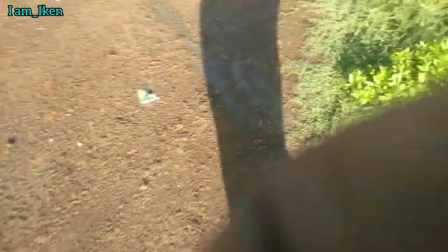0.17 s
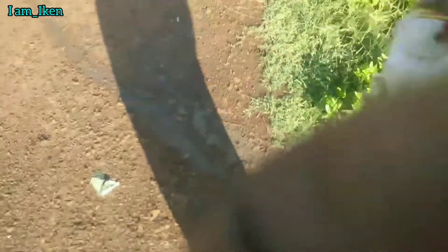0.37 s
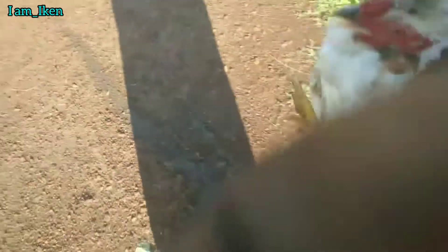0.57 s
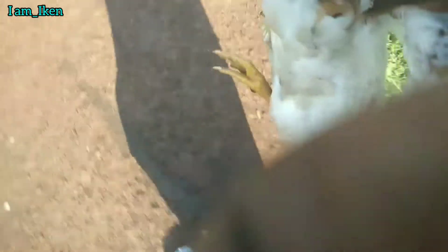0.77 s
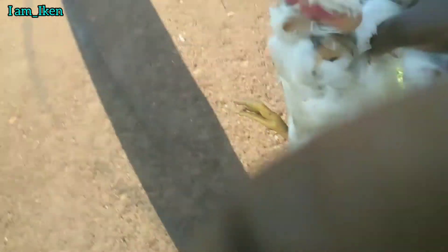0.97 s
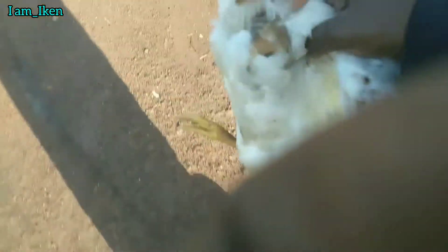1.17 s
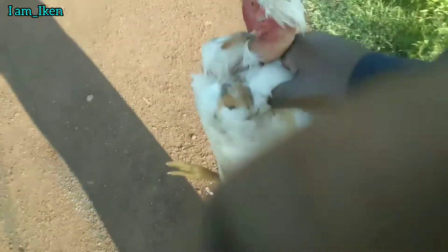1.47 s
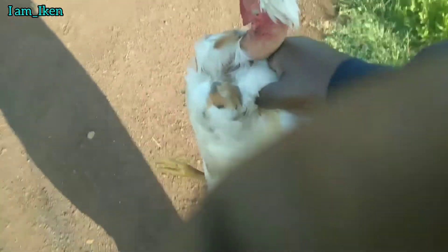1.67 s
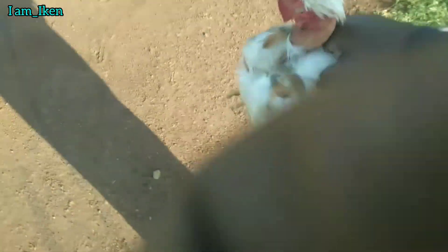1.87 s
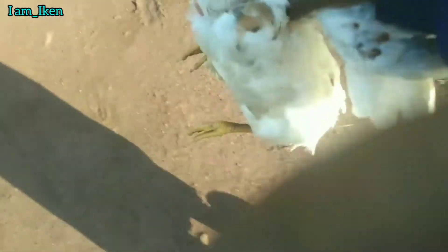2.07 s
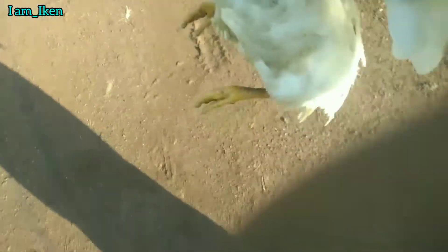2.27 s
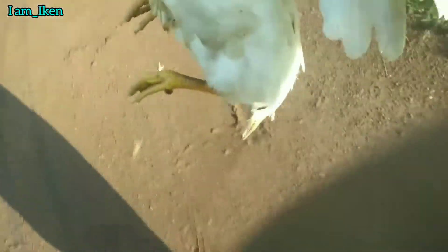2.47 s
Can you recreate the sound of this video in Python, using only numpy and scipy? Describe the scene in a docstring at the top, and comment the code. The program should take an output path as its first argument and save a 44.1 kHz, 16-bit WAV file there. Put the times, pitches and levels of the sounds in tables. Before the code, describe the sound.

Three loud, hoarse squawks from a hen held close outdoors, her feathers rustling softly.

```python
"""A squawking hen

A hen, carried by hand outdoors close to a camera, squawks three times. Her voice is a stream of pulses
and puffs of air, shaped by her throat and beak. Each call starts as a hoarse rasp, opens into a scream
or a fluttering squawk and drops as the beak shuts. Feathers rustle between the calls (grainy noise),
a small bird whistles far off (gliding tones) and the air rumbles faintly (low noise)."""
import sys
import numpy as np
from scipy import signal
from scipy.fft import rfft, irfft, next_fast_len
from scipy.io import wavfile
from scipy.ndimage import uniform_filter1d, map_coordinates

SR = 44100
rng = np.random.default_rng(int(sys.argv[2]) if len(sys.argv) > 2 else 0)


def master_out(mix):
    """Clip the mix to full scale and print it as 16-bit PCM to the path in sys.argv[1]."""
    frames = np.transpose(np.atleast_2d(mix))
    ceiling = np.clip(frames, -1, 1)
    pcm = np.round(ceiling * 32767).astype(np.int16)
    wavfile.write(sys.argv[1], SR, pcm)


N = 114660

# The three calls. Each row: time in seconds, pitch in Hz, level in dB, then three amounts from
# 0 to about 1: roughness, doubling (every other pulse comes late and weak) and flutter.
FIRST_CALL = [(.17, 735.4, -45, 0.31, 0, 0.08), (0.194, 722.3, -28.5, 0.48, 0, 0),
              (0.244, 752, -23, 0.38, 0.57, 0.01), (.268, 829.4, -28.5, 0.47, 0.3, 0),
              (.305, 781, -20.5, 1.03, 0.7, 0.06), (0.374, 795.7, -21.5, 0.99, 0.04, 0),
              (.41, 756.3, -14, 0.77, 0.07, 0.03), (.423, 748.7, -16.5, 0.2, 0.23, 0),
              (0.446, 732.3, -14, 0.01, 0.3, 0.07), (.458, 743.3, -16, 0.82, 0.53, 0),
              (.549, 723.6, -14, 0.43, 0.1, 0.08), (.555, 713, -15.5, .06, 0.13, 0.08),
              (0.592, 689, -11.5, 0.17, 0, 0.2), (0.641, 648.4, -16.5, .08, 0.01, 0.28),
              (0.731, 654, -16, 0.1, 0.14, 0.17), (0.786, 626, -17.5, 0.08, 0, 0.16),
              (.815, 622.3, -13, 0, 0.01, 0.2), (0.837, 644.4, -14, 0.32, 0, 0.05),
              (.875, 634.4, -14, 0.1, 0.01, 0.22), (0.927, 650.7, -15.5, 0.1, 0, 0.3),
              (.953, 612.4, -14, 0.18, 0.06, 0.3), (.968, 593.4, -16, 0.41, 0.12, 0.5),
              (1.015, 578, -19.5, 0.29, 0, 0.57), (1.034, 528, -21.5, 0.7, 0.5, 0.07),
              (1.045, 457.2, -61.5, 1.07, 0.8, 0)]
SECOND_CALL = [(1.408, 711, -51.5, 1, 0.56, 0.13), (1.425, 730.6, -32.5, 0.74, .3, 0.059),
               (1.44, 757.4, -30.5, 0.23, 0.19, 0.045), (1.45, 742, -64, .3, .2, 0),
               (1.462, 719, -51, .3, 0.33, 0.038), (1.47, 717.4, -30, 0.57, .5, 0.16),
               (1.525, 683.5, -28, 0.22, .8, 0.11), (1.584, 715.4, -31.5, 0.62, 0.42, 0.092),
               (1.642, 705.2, -27, 0.63, 0.25, 0.44), (1.686, 664.3, -22, .35, .1, 0.82),
               (1.77, 637.7, -19.5, 0.3, 0.18, 0.48), (1.866, 674.5, -19, 0.36, .1, 0.68),
               (1.925, 654, -19.5, 0.47, .1, 0.34), (1.968, 582.4, -26.5, 0.99, .6, 0.33),
               (1.977, 470, -59, 0.62, 0.81, 0.013)]
THIRD_CALL = [(2.067, 669.5, -47, 0.39, 0.26, 0.034), (2.085, 669, -29, .35, 0.93, 0.027),
              (2.13, 719.2, -32.5, .55, 0.91, 0), (2.151, 752.5, -30.5, 0.18, 1, 0.15),
              (2.182, 798, -31, 0.27, .9, 0), (2.198, 702, -23.5, 0.3, .3, 0.1),
              (2.244, 673, -19, 0.19, .1, 0.54), (2.284, 659, -20.5, 0.45, 0.082, 0.6),
              (2.316, 628, -19.5, .35, 0.078, 0.56), (2.341, 611.5, -24.5, 0.15, 0.078, 0.34),
              (2.357, 570, -23, 0.15, .2, .1), (2.368, 520, -27, 0.94, .6, 0),
              (2.382, 484, -47, .9, .7, 0.89)]
# How each call flutters. Each row: time of one crest in seconds, rate in Hz, lag of the pitch
# behind the swell in radians.
CALL_FLUTTERS = [(.953, 34.97, 0.5), (1.77, 39.28, 4), (2.249, 42.8, 2)]
FLUTTER_DB, FLUTTER_BEND, FLUTTER_BREAK = 4.5, 0.077, 0.98  # swell, pitch swing, roughness in the dips
FLUTTER_BRIGHT_DB, BRIGHT_HZ = 4.5, 1550  # the crests lift the treble above this frequency
PITCH_JITTER, TIME_SCATTER, SIZE_SCATTER_DB = 0.05075, 0.093, 5.5  # unevenness at full roughness
DOUBLING_SHIFT, DOUBLING_SIZE = 0.065, 0.097  # share of a cycle, share of a pulse's size
GROWL_HZ, GROWL_DEPTH, GROWL_BEND = 135, 0.39, 0.064  # a slower beat: rate, share of level, of pitch
BREATH_DB, BREATH_GROWTH = -1, 1.32  # breath at full roughness, and how steeply it grows
# Tone colours of the throat and beak, by name. Each row: frequency in Hz, gain in dB.
THROAT_COLOURS = { "wheeze": [(200, -39), (380, -4), (550, -12), (750, 2), (1000, -8.5), (1500, -17.5),
                  (2000, -5.5), (2600, -1), (3300, -18.5), (4200, -19.5), (5200, -34.5), (7500, -21.5),
                  (10500, -41.5), (15000, -45.5)], "hoarse": [(200, -34), (360, -2.5), (520, -8), (720, 3),
                  (950, -11), (1400, -2), (1750, -4.5), (2300, -8.5), (2800, -9.5), (3700, -13),
                  (4700, -32), (7500, -28), (10000, -41.5), (15000, -65)], "rasp": [(250, -38.5),
                  (500, -12), (750, 1.5), (1050, -7.5), (1550, 0), (2050, -10.5), (2600, 7), (3050, 8),
                  (3500, -10), (4200, -6), (5200, -22.5), (6500, -21), (9000, -21), (11000, -38.5),
                  (15000, -47.5)], "scream": [(250, -18.5), (450, -11), (660, 4.5), (950, -3.5),
                  (1300, -1.5), (1600, 2), (1950, 5), (2300, 0.5), (2650, -3.5), (3300, 5), (3900, -5),
                  (4600, -10.5), (5600, -17), (6500, -7.5), (7700, -20.5), (9500, -25), (11500, -46),
                  (15000, -61.5)], "squawk": [(250, -25), (450, -10), (670, -1.5), (930, -5), (1320, 5.5),
                  (1650, 1.5), (1950, -3), (2250, -11), (2600, -9.5), (2900, -17.5), (3250, -6), (3850, -9),
                  (4600, -21), (7500, -24), (10000, -37.5), (15000, -51.5)], "cackle": [(250, -27.5),
                  (450, -10.5), (680, -5.5), (920, -2), (1300, 0.5), (1600, -4.5), (1920, 3), (2250, -11),
                  (2550, -1), (2950, -18.5), (3300, -6.5), (3950, -13), (4600, -18.5), (6200, -30.5),
                  (8000, -32), (10500, -51), (15000, -75.5)], "shut": [(150, -20), (260, -8), (600, -8),
                  (1150, 2), (1500, 0), (2000, -17.5), (2450, -11), (3000, -28), (3600, -11.5), (4600, -46),
                  (8000, -40.5), (15000, -79.5)]}
# The voice fades from one colour to the next. Each row: time in seconds, name of the colour.
THROAT_CHANGES = [(.25, "wheeze"), (.33, "rasp"), (0.519, "rasp"), (.575, "scream"), (0.949, "scream"),
                  (0.976, "cackle"), (1.017, "shut"), (1.43, "shut"), (1.47, "hoarse"), (1.569, "hoarse"),
                  (1.68, "squawk"), (1.925, "squawk"), (1.969, "shut"), (2.059, "hoarse"), (2.18, "hoarse"),
                  (2.22, "cackle"), (2.321, "cackle"), (2.355, "shut")]
# A narrow, moving dip in the treble. Each row: time in seconds, centre in Hz, depth in dB.
MOVING_NOTCH = [(.25, 3180, 3.5), (.3, 3135, 23.5), (.45, 3515, 13), (0.519, 4077, 26.5),
                (0.561, 4860, 26.5), (0.621, 4684, 25), (.68, 4514, 2.5), (1.999, 4487, 7),
                (2.14, 4500, 12), (2.33, 4380, 16)]
NOTCH_WIDTH = 0.088  # share of its frequency
SQUEAK_S, SQUEAK_WIDTH_S, SQUEAK_HZ, SQUEAK_DB, SQUEAK_FALL_DB = 1.46, 0.013, 1220, -30.5, 8.5
# The cluck that ends each call. Each row: time in seconds, level in dB.
CLOSING_CLUCKS = [(1.033, -46), (1.966, -43), (2.369, -46.5)]
CLUCK_HZ, CLUCK_WIDTH_S = 242.5, 0.015
# The head swings past two microphones. Each row: time in seconds, how much earlier the left one
# hears it in milliseconds, how much louder in dB.
HEAD_SWING = [(.2, 0.22, 5.5), (.43, .17, 3.5), (.52, 0.12, 2), (.6, 0.089, -1.5), (.7, 0.016, -0.5),
              (.8, 0.0043, 0), (.9, -0.055, -2), (1, 0.0047, 1.5), (1.52, -0.037, 0.5), (1.85, .01, 0.5),
              (2.12, -0.055, 0), (2.33, -0.081, -1)]
# Echoes off arm, body and ground, and from the yard. Each row: frequency in Hz, gain in dB.
NEAR_COLOUR = [(500, -7.5), (2000, -12), (4000, -7.5), (8000, 5)]
YARD_COLOUR = [(300, -42.5), (1500, -36), (8000, -29.5)]
NEAR_FADE_S, YARD_FADE_S = 0.046, 0.55  # time to fade by 60 dB
# Feathers brushing. Each row: time in seconds, level in dB.
RUSTLE_LEVELS = [(0, -80), (1, -74), (1.13, -61), (1.16, -55), (1.22, -54.5), (1.28, -58.5), (1.33, -85.5),
                 (1.95, -58), (2.05, -53), (2.3, -48), (2.45, -73.5), (2.495, -57.5), (2.6, -50)]
# Feathers flick against the hand. Each row: start in seconds, peak in dB before FLICK_GAIN_DB is added,
# seconds to fade by 60 dB.
FLICKS = [(1.1458, -32.5, 0.015), (1.1564, -36, 0.017), (1.2145, -34, 0.015), (2.0576, -30, 0.022),
          (2.4678, -41.5, 0.018), (2.496, -37, 0.012)]
RUSTLE_GRAIN_DB, FLICK_GAIN_DB = 4.5, -7
# The tone colour of the feathers. Each row: frequency in Hz, gain in dB.
FEATHER_COLOUR = [(240, -46), (400, -9), (519, -5.5), (809, -17), (1630, -4), (2750, -14.5), (8400, -11),
                  (10700, -24), (15500, -25.5)]
# The far bird, one list for each whistle. Each row: time in seconds, pitch in Hz, level in dB.
BIRD_WHISTLES = [
    [(1.08, 6030, -66), (1.093, 4100, -63), (1.107, 7470, -72), (1.14, 7230, -70), (1.19, 4850, -71)],
    [(2.0, 5330, -78), (2.02, 4700, -56), (2.045, 3302, -50)],
]
# Tone colours of the air's rumble and the outdoor hush. Each row: frequency in Hz, gain in dB.
RUMBLE_COLOUR = [(20, -24), (40, -17.5), (65, -2), (110, -3.5), (170, -12.5), (270, -16.5), (380, -27),
                 (550, -39.5), (1000, -69.5)]
HUSH_COLOUR = [(200, -12), (400, -23.5), (750, -23.5), (1050, -22), (1300, -2.5), (1800, 4), (2400, -23),
               (3500, -24), (6000, -23), (10000, -39.5), (15000, -50)]
RUMBLE_DB, HUSH_DB = -52, -65
TOP_HZ = 15800


def hen():
    """The voice box buzzes, the throat and beak shape the buzz, and a squeak and clucks join in."""
    calls = (FIRST_CALL, SECOND_CALL, THIRD_CALL)
    parts = [voice_box(call, *flutter) for call, flutter in zip(calls, CALL_FLUTTERS)]
    buzz, loudness, swell = np.sum(parts, axis=0)
    treble = signal.sosfiltfilt(signal.butter(2, BRIGHT_HZ, "high", fs=SR, output="sos"), buzz)
    buzz = buzz + treble * (amp(FLUTTER_BRIGHT_DB * swell) - 1)
    voice = moving_notch(throat(buzz))
    # Even out the level first, so that the call tables set the loudness.
    power = np.abs(uniform_filter1d(voice ** 2, size=700))
    return loudness * voice / np.sqrt(power + 1e-4 * power.mean()) + squeak() + clucks()


def voice_box(call, crest_s, flutter_hz, pitch_lag):
    """Each vibration gives a pulse and a puff of air. Returns the buzz, its loudness and its swell."""
    t = clock()
    hz, db, rough, doubling, flutter = curves(call)
    sounding = (t > call[0][0]) & (t < call[-1][0])
    flutter_angle = 2 * np.pi * flutter_hz * (t - crest_s) + 0.68 * wobble(30)
    swell = flutter * np.cos(flutter_angle)
    rough = np.clip(rough * (1 - FLUTTER_BREAK * swell), 0.01, 1.2)
    growl = rough * np.sin(2 * np.pi * GROWL_HZ * t + 2 * wobble(60))
    bend = FLUTTER_BEND * flutter * np.cos(flutter_angle - pitch_lag) + GROWL_BEND * growl
    jitter = PITCH_JITTER * rough * wobble(350) + 0.0045 * wobble(90)
    hz = hz * (1 + bend + jitter)
    # Place one pulse wherever a whole cycle is complete.
    phase = np.cumsum(hz * sounding) / SR
    cycles = np.arange(1, int(phase[-1]))
    positions = np.interp(cycles, phase[sounding], np.flatnonzero(sounding))
    at = positions.astype(int)
    # Roughness changes each pulse's timing and size at random; doubling does so by turns.
    time_luck, size_luck = np.sqrt(3) * rng.uniform(-1, 1, (N // 100, 2))[:len(cycles)].T
    by_turns = doubling[at] * (-1) ** cycles
    period = SR / hz[at]
    positions = positions + period * (TIME_SCATTER * rough[at] * time_luck + DOUBLING_SHIFT * by_turns)
    sizes = amp(SIZE_SCATTER_DB * rough[at] * size_luck) * (1 - DOUBLING_SIZE * by_turns)
    puffs = (1 + np.cos(2 * np.pi * phase)) * rng.standard_normal(N)
    breath = amp(BREATH_DB) * rough ** BREATH_GROWTH * puffs * sounding
    buzz = (pulses(positions, sizes * np.sqrt(period)) + breath) * (1 + GROWL_DEPTH * growl)
    return buzz, sounding * amp(db + FLUTTER_DB * swell), sounding * swell


def throat(buzz):
    """The throat changes shape, fading the buzz from one tone colour to the next."""
    times, names = zip(*THROAT_CHANGES)
    voice = np.zeros(N)
    for name, colour in THROAT_COLOURS.items():
        share = np.interp(clock(), times, [float(n == name) for n in names])
        voice += share * coloured(buzz, colour)
    return voice


def moving_notch(voice):
    """A narrow dip in the treble that climbs during the first call, like a reflection off the hand."""
    hz, t, spectrum = signal.stft(voice, SR, nperseg=512)
    times, centre_hz, depth_db = np.transpose(MOVING_NOTCH)
    distance = (hz[:, None] / np.interp(t, times, centre_hz) - 1) / NOTCH_WIDTH
    cut_db = np.interp(t, times, depth_db) * np.exp(-distance ** 2)
    return signal.istft(spectrum * amp(-cut_db), SR, nperseg=512)[1][:N]


def squeak():
    """The voice cracks once into a short whistle of three harmonics, each weaker than the last."""
    t = clock() - SQUEAK_S
    tone = sum(amp(SQUEAK_DB - SQUEAK_FALL_DB * k) * np.sin(2 * np.pi * (k + 1) * SQUEAK_HZ * t)
               for k in range(3))
    return tone * np.exp(-(t / SQUEAK_WIDTH_S) ** 2)


def clucks():
    """The throat closes after each call with a few soft, slow vibrations."""
    out = np.zeros(N)
    for time_s, db in CLOSING_CLUCKS:
        t = clock() - time_s
        out += amp(db) * np.exp(-(t / CLUCK_WIDTH_S) ** 2) * np.sin(2 * np.pi * CLUCK_HZ * t)
    return out


def head_swing(voice):
    """The microphone nearer the hen's head hears her earlier and louder."""
    lead_ms, pan_db = curves(HEAD_SWING)
    shift = lead_ms * SR / 1000
    return np.array([amp(side * pan_db) * map_coordinates(voice, [np.arange(N) + side * shift])
                     for side in (0.5, -0.5)])


def echo(voice, colour, fade_s):
    """Many small reflections blur into a fading tail, different at each microphone."""
    t = np.arange(SR // 2) / SR
    tail = rng.standard_normal((2, len(t))) * amp(-60 * t / fade_s)
    tail /= np.linalg.norm(tail, axis=1, keepdims=True)
    return signal.fftconvolve(coloured(voice, colour)[None], tail, axes=1)[:, :N]


def feathers():
    """Feathers brush with a grainy hiss and now and then flick against the hand."""
    t = clock()
    db, = curves(RUSTLE_LEVELS)
    grain = amp(RUSTLE_GRAIN_DB * wobble(360))
    brush = amp(db) * unit(grain * noise(FEATHER_COLOUR, width=0.6))
    flicks = sum((t > start) * amp(peak_db - 60 * np.abs(t - start) / fade_s)
                 for start, peak_db, fade_s in FLICKS)
    return brush + amp(FLICK_GAIN_DB) * flicks * noise(FEATHER_COLOUR, width=0.5)


def far_bird():
    """A small bird whistles thin, gliding tones."""
    t = clock()
    out = np.zeros(N)
    for whistle in BIRD_WHISTLES:
        hz, db = curves(whistle)
        sounding = (t > whistle[0][0]) & (t < whistle[-1][0])
        fade = uniform_filter1d(1.0 * sounding, size=300)
        out += fade * amp(db) * np.sin(2 * np.pi * np.cumsum(hz) / SR)
    return out


def outdoor_air():
    """The air makes a low, unsteady rumble and a faint hush."""
    rumble = amp(RUMBLE_DB + 1.5 * wobble(13)) * noise(RUMBLE_COLOUR, width=0.16)
    return rumble + amp(HUSH_DB) * noise(HUSH_COLOUR, width=0.5)


def amp(db):
    """Turn decibels into a number to multiply by."""
    return 10 ** (np.asarray(db) / 20)


def unit(x):
    """Scale a sound to an average power of 1."""
    return x / np.sqrt(np.mean(x ** 2) + 1e-20)


def clock():
    """The time of each sample in seconds."""
    return np.arange(N) / SR


def curves(rows):
    """Join a table's rows with straight lines: one curve for each column after the time."""
    times, *columns = np.transpose(rows)
    return [np.interp(clock(), times, column) for column in columns]


def wobble(rate):
    """A smooth curve through `rate` random values a second."""
    return map_coordinates(rng.standard_normal(N // 8), [clock() * rate], mode="wrap")


def coloured(x, colour):
    """Filter a sound with a tone colour given as rows of frequency and gain."""
    size = 2 * next_fast_len(N // 2 + 8192)
    hz, db = np.transpose(colour)
    gain_db = np.interp(np.log(np.fft.rfftfreq(size, 1 / SR) + 1), np.log(hz + 1), db)
    # Folding the cepstrum makes the filter ring only after a sound, never before it.
    cepstrum = irfft(np.log(amp(gain_db)), size)
    cepstrum[1:size // 2] *= 2
    cepstrum[size // 2 + 1:] = 0
    return irfft(rfft(x, size) * np.exp(rfft(cepstrum)), size)[..., :N]


def noise(colour, width):
    """Coloured stereo noise; a width of 0 is the same in both ears, 1 is fully spread."""
    mid, side = coloured(rng.standard_normal((2, N)), colour)
    return unit(np.array([mid + width * side, mid - width * side]))


def pulses(positions, sizes):
    """Clean clicks that can fall between two samples."""
    index = np.floor(positions)[:, None].astype(int) + np.arange(-7, 9)
    offset = index - positions[:, None]
    shape = np.sinc(offset) * np.cos(np.pi * offset / 16) ** 2
    return np.bincount(np.clip(index, 0, N - 1).ravel(), (sizes[:, None] * shape).ravel(), N)


def scene():
    """Mix the hen close by with her echoes, her feathers and the yard behind her."""
    voice = hen()
    echoes = echo(voice, NEAR_COLOUR, NEAR_FADE_S) + echo(voice, YARD_COLOUR, YARD_FADE_S)
    return head_swing(voice) + echoes + feathers() + far_bird() + outdoor_air()


def record(dry):
    """The camera keeps no treble above TOP_HZ."""
    size = next_fast_len(N + SR // 2)
    kept = np.fft.rfftfreq(size, 1 / SR) < TOP_HZ
    return irfft(rfft(dry, size) * kept, size)[:, :N]


dry = scene()
out = record(dry)
master_out(out)
```